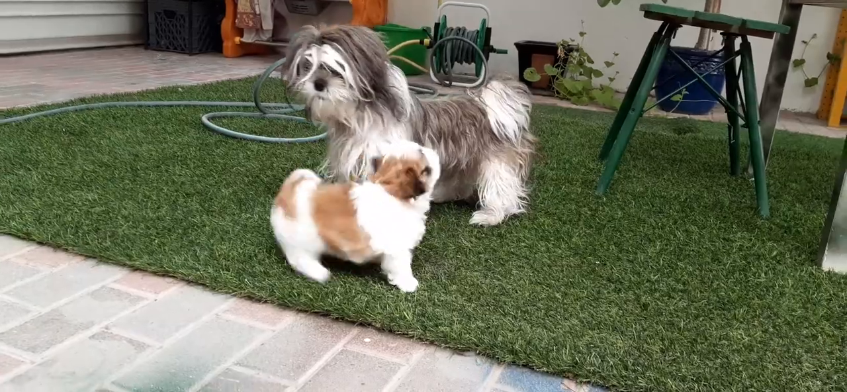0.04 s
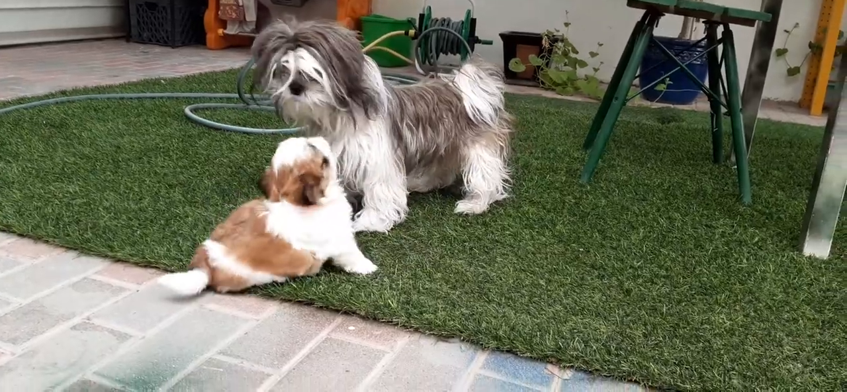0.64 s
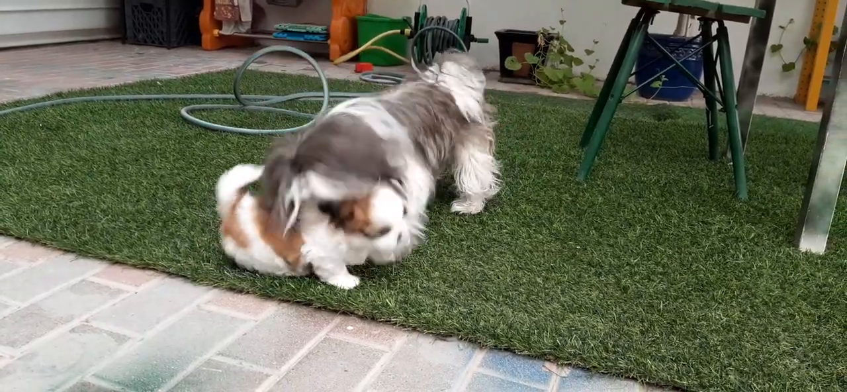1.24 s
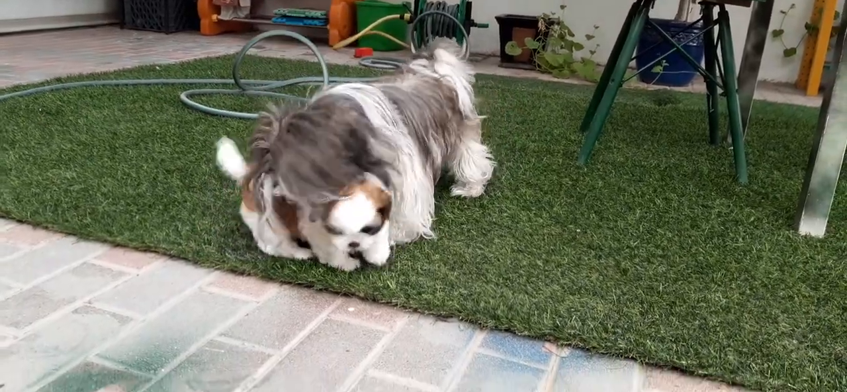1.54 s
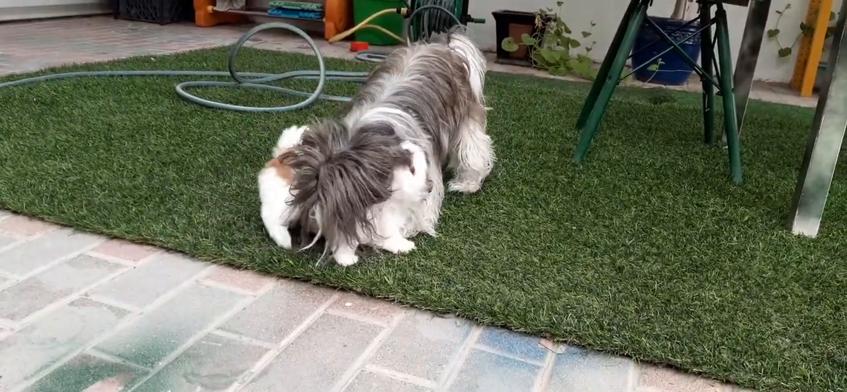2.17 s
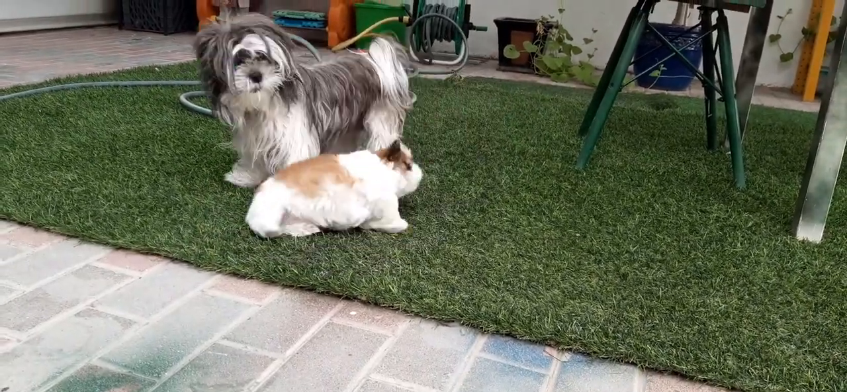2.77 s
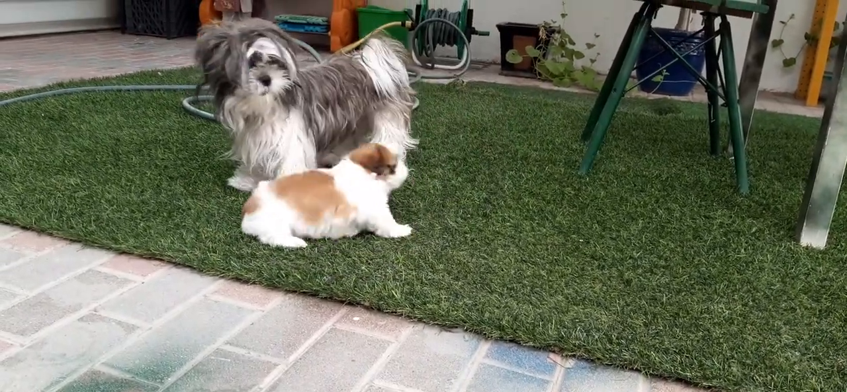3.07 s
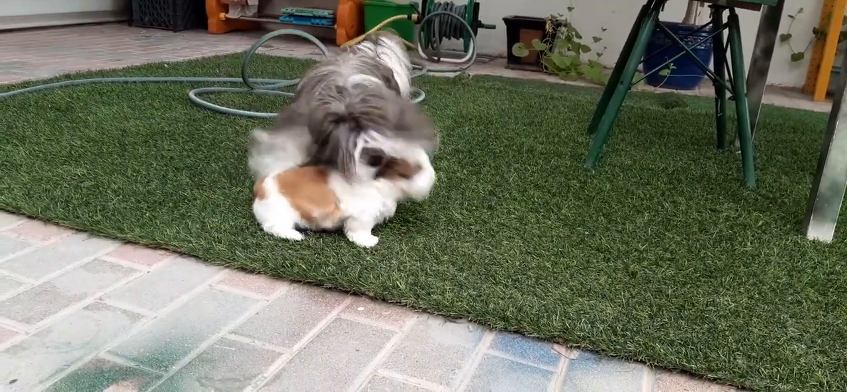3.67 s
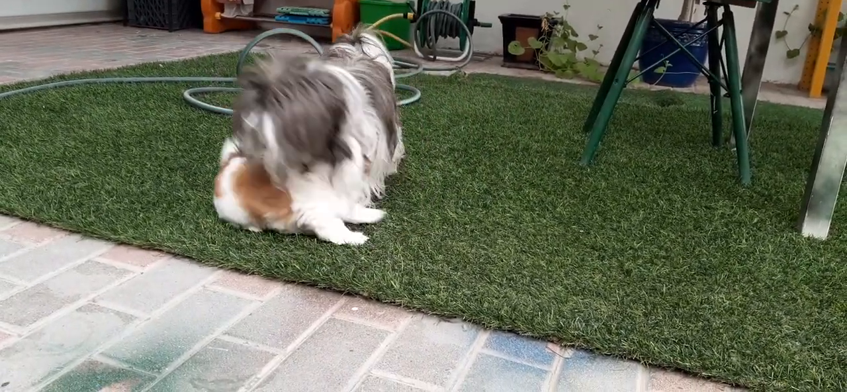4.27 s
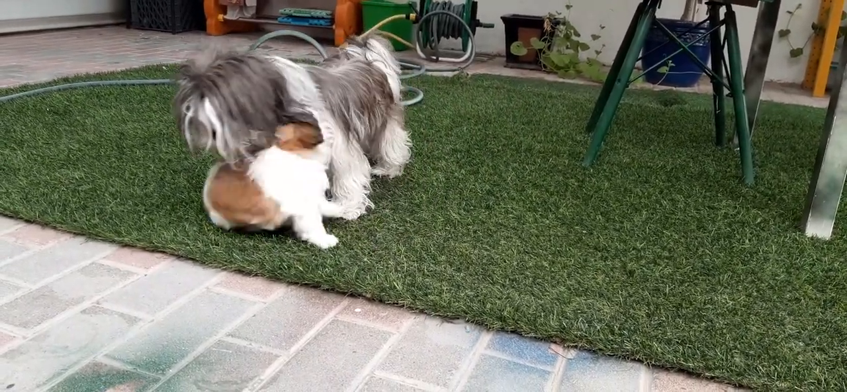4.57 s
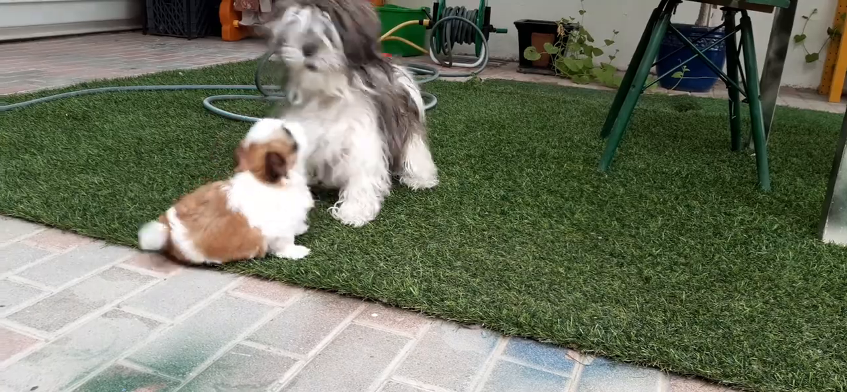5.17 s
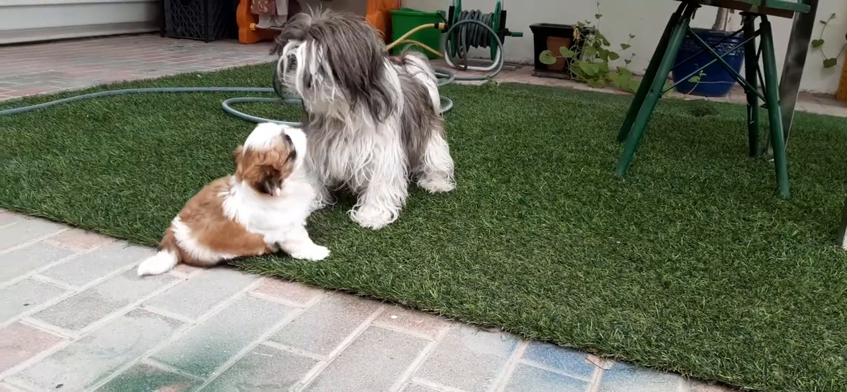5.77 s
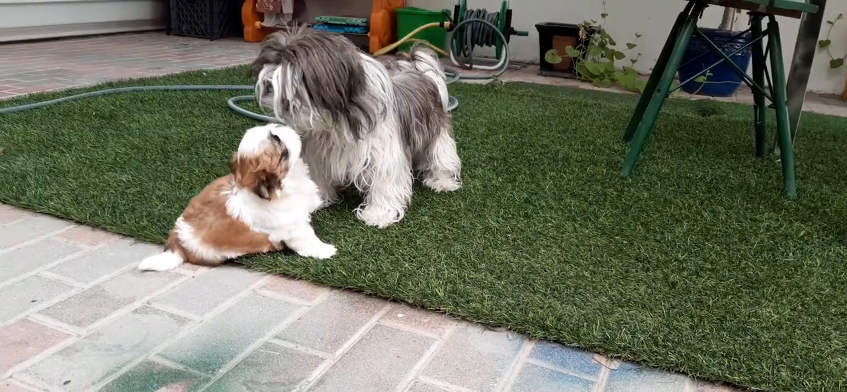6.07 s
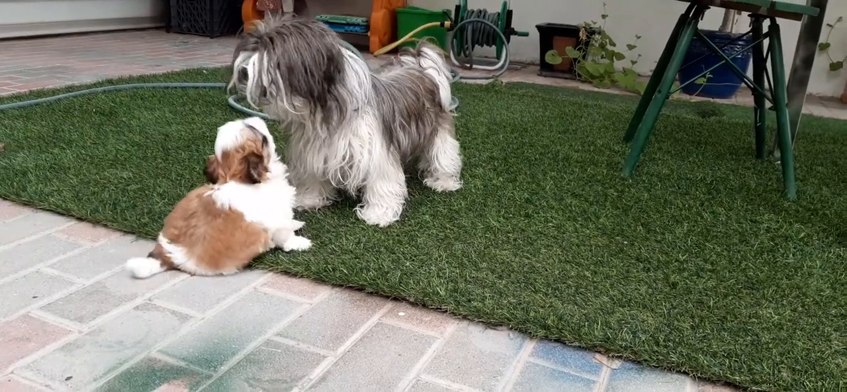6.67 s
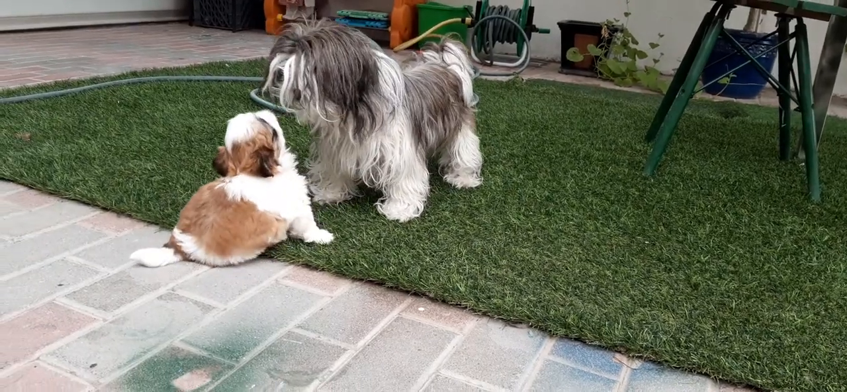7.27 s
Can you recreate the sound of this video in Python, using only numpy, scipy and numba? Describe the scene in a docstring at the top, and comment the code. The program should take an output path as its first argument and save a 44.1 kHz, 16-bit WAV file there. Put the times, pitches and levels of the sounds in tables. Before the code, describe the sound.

A small puppy growls close by in rough, rapid throbs for the first half second, playing with an older dog in a walled yard. A faint, thin whimper comes at about 0.7 seconds, followed by soft snuffling and paws scuffing on turf. Two shrill yaps at about 2.2 and 2.4 seconds ring briefly off the walls, with a growl between them and another near 2.8. A few sharp little clicks fall around 3.3 seconds and one more at 4. Growling returns near 3.8 and turns into a bright, raspy snarl from 4.2 to 4.6 seconds. A third yap comes near 4.9, amid soft footfalls. A very faint growl follows, and a last soft one at about 6.3 to 6.6 seconds. A gentle fluttering hiss swells around the yaps and growls. Sparrows chirp faintly throughout, over a low, distant town rumble, until about 7.4 seconds.

```python
"""A small puppy growls at an older dog on artificial turf in a walled yard, its voice coming through
the throat in rough throbs, about 27 a second. A faint whimper and snuffling lead to two shrill yaps
that ring off the walls. More growls and a few small clicks follow; the lips draw back in a bright
snarl, a third yap flies out near 5 s, and softer growls trail off. Along the way paws scuff, a soft
fluttering hiss swells around the yaps and growls, and sparrows chirp over a far town rumble."""
import sys
import numpy as np
from scipy import signal
from scipy.fft import rfft, irfft
from scipy.io import wavfile
from scipy.ndimage import uniform_filter1d
from numba import njit

SR = 44100
rng = np.random.default_rng(int(sys.argv[2]) if len(sys.argv) > 2 else 0)


def log_audio(samples):
    """Write samples as a 16-bit WAV file to the path given in sys.argv[1]."""
    # one column per channel
    frames = np.atleast_2d(samples).T
    # limit to full scale, then quantise
    limited = np.clip(frames, -1, 1)
    pcm = np.round(limited * 32767).astype(np.int16)
    wavfile.write(sys.argv[1], SR, pcm)


N = 327663
HZ = np.maximum(np.fft.rfftfreq(2 * N, 1 / SR), 1)   # frequency grid of the filters

# colour of the far town and of the open air: (frequency [Hz], relative level [dB])
TOWN_SPECTRUM = [(25, -39), (38, -14), (52, 0), (105, 3.5), (160, -4), (290, -6.5), (476, -20.5),
                 (796, -15.5), (1190, -42), (2410, -41), (3430, -53.5), (4870, -31), (8360, -63.5),
                 (16000, -47.5)]
AIR_SPECTRUM = [(25, -41.5), (600, -20.5), (1200, 7.5), (3000, -6), (5000, 5.5), (8000, -9.5),
                (16000, -7.5)]
# ring of the walls: (frequency [Hz], time to fall 60 dB [s])
WALL_DECAY = [(200, 0.37), (700, 0.51), (1800, 0.2257), (5000, 0.6), (14000, 0.38)]
# reverb send of the dogs: (frequency [Hz], gain [dB])
WALL_SEND = [(200, -14.5), (700, -8.5), (1500, -2.5), (2400, -6.5), (3300, -7), (5000, -16.5), (7000, -7.5),
             (9000, -7), (14000, -11)]
# colour difference of the two microphone ports: (frequency [Hz], left minus right [dB])
PORT_TILT = [(100, -2), (700, .5), (2000, 0.5), (3000, -1.5), (3700, -9), (5200, -11), (6800, -7.5),
             (8200, 7), (11000, 2), (13000, -3), (15500, -8.5)]
# how far the right port trails the left: (frequency [Hz], phase lag [rad])
PORT_PHASE = [(100, .1), (800, .6), (1500, 1), (2500, .6), (3100, .3), (4000, 2.2), (5200, 3.6),
              (7500, 6.3), (11000, 7), (15000, 8)]

# sparrow chirps, long slurs and hoarse cheeps: (time [s], length [s], start pitch [Hz], level [dB])
SPARROW_CHIRPS = [(.56, 0.17, 5510, -54), (1.135, 0.11, 5120, -51), (2.49, 0.16, 5410, -50),
                  (2.88, .09, 4898, -54), (3.81, 0.061, 4820, -61), (4.11, 0.19, 5396, -53.5),
                  (5.44, 0.15, 5480, -77), (5.985, 0.11, 6760, -60.5), (5.99, .22, 5540, -53.5),
                  (6.3, 0.12, 4850, -56), (7.22, 0.24, 5550, -55)]
SPARROW_SLURS = [(1.47, .12, 5070, -59), (6.635, .13, 5240, -61)]
SPARROW_CHEEPS = [(.92, 0.075, 4150, -64), (1.78, 0.069, 3870, -59.5), (1.905, .08, 3957, -57),
                  (2.07, .1, 3950, -56.5)]
# sharp little clicks: (time [s], peak level [dB], ring [Hz])
TICKS = [(3.2494, -27, 6200), (3.291, -23.5, 13800), (3.3384, -38.5, 7200), (4.046, -37, 7200)]

# soft high hiss that swells around the yaps and growls: (time [s], level [dB])
SOFT_HISS_LEVEL = [(0, -61.5), (.2, -64.5), (.5, -72.5), (1, -68), (1.68, -75), (2.05, -66.5), (2.4, -51),
                   (2.84, -59.5), (3.2, -76.5), (3.7, -67.5), (4.2, -66), (4.4, -55.5), (4.9, -68.5),
                   (5.08, -57.5), (5.55, -95), (6.5, -64), (7.1, -84.5), (7.43, -69.5)]
# nose puffs, paw scuffs and jaw snaps, soft landings: (centre time [s], length [s], level [dB])
NOSE_PUFFS = [(.82, 0.16, -53), (1.29, 0.21, -61), (1.69, 0.17, -48), (1.9, 0.81, -54), (2.56, 0.13, -50.5),
              (3.87, 0.19, -61.5)]
SCUFFS_AND_SNAPS = [(.49, 0.0085, -52), (1.235, 0.069, -58.5), (1.31, 0.21, -62), (1.56, .29, -58.5),
                    (1.7, .22, -57), (2.012, 0.01, -51.5), (2.536, 0.025, -35), (3.65, 0.15, -58),
                    (3.695, 0.015, -47), (4.047, 0.0101, -43), (4.68, .048, -49), (4.76, 0.16, -58.5),
                    (5.104, 0.037, -48.5)]
LANDINGS = [(.66, 0.19, -56.5), (.76, 0.076, -56), (4.7, 0.33, -52.5), (5.06, 0.071, -51),
            (5.105, 0.054, -45.5)]
# colour of the soft hiss, nose, scuffs and landings: (frequency [Hz], relative level [dB])
SOFT_HISS_SPECTRUM = [(400, -0.5), (900, 4.5), (1500, -3.5), (2400, 0.5), (4000, 3.5), (7000, 3.5),
                      (9000, -18.5), (12000, -3.5), (16000, -2.5)]
NOSE_SPECTRUM = [(1000, -7.5), (1400, -19), (2000, -12), (2700, -12), (3600, 0.5), (4800, 1.5), (6000, 3),
                 (7000, 2), (9000, -21), (10500, -9.5), (13000, -7), (16000, -3.5)]
SCUFF_SPECTRUM = [(150, -6.5), (700, 3.5), (1400, -9), (2200, -1), (3200, -11.5), (6500, -6),
                  (9000, -30), (15000, -19)]
LANDING_SPECTRUM = [(40, -21), (90, -2.5), (350, -3), (650, -16), (1300, -28.5), (4000, -58.5)]

# a faint whimper: (time [s], length [s], start pitch [Hz], level [dB])
WHIMPER_NOTE = [(.745, 0.052, 553, -55)]
# muzzle resonances for rasp, hiss and drawn-back lips: (centre [Hz], width [Hz], gain [dB])
RASP_MODES = [(1360, 540, -10.5), (1730, 640, -5), (2079, 430, 1.5), (2402, 110, -1), (4096, 410, -13),
              (4710, 620, -15.5)]
HISS_MODES = [(3320, 1100, -6), (3780, 417, 1), (4540, 250, 0), (5090, 305.3, 0), (5930, 470, -10.5)]
SNARL_MODES = [(2510, 230, 4.5), (3200, 290, -8), (3860, 350, -3.5), (4850, 480, -0.5), (5530, 580, -7.5),
               (6940, 290, -18.5)]
# one curve per growl, first throb to last: (time [s], throat tuning [Hz], throat [dB], rasp [dB])
GROWL_CURVES = [
    [(0.017, 490, -33, -44), (0.14, 417, -38.5, -56.5), (0.25, 448, -37.5, -51.5), (0.398, 335, -40.5, -62)],
    [(2.272, 470, -33.5, -56.5), (2.308, 454, -37.5, -56), (2.345, 498, -31.5, -47.5)],
    [(2.695, 755.5, -35, -57), (2.725, 840, -30.5, -44.5), (2.82, 625, -38.5, -57.5),
     (2.95, 700, -32.5, -46.5), (2.982, 720, -35.5, -51)],
    [(3.742, 653, -47, -68.5), (3.855, 571, -38, -47.5), (3.974, 417, -43.5, -64.5)],
    [(4.186, 648, -34, -42), (4.3, 459, -30, -47), (4.365, 511, -29.5, -39), (4.44, 490, -31, -55.5),
     (4.51, 477.5, -32, -34.5), (4.55, 524, -40, -46.5)],
    [(5.228, 488, -54, -76), (5.304, 480, -52.5, -84)],
    [(6.28, 413, -40, -60), (6.4, 466, -41.5, -58.5), (6.592, 367, -52.5, -70.5)],
]
# bright rasp as the lips draw back in the fiercest growl: (time [s], level [dB])
SNARL_LEVEL = [(4.179, -37.5), (4.22, -39), (4.255, -32), (4.3, -32.5), (4.35, -24.5), (4.39, -61),
               (4.45, -62.5), (4.48, -33.5), (4.56, -53)]
# yaps: (start [s], hardest push [s], crest [s], end [s], top pitch [Hz], mouth resonance at start [Hz],
# at crest [Hz], at end [Hz], mouth level [dB], fade by the end [dB], flare at the crest [dB],
# throat level [dB], hiss level [dB], extra lag at the right port [ms])
YAP_CUES = [(2.145, 2.175, 2.203, 2.248, 750.2, 2330, 2328, 2254, -12, 22, -1, -22, -22, -0.023),
            (2.35, 2.396, 2.399, 2.464, 720.3, 2650, 2290, 1800, -22.5, 16, 10.5, -26, -28, 0.015),
            (4.843, 4.869, 4.898, 4.955, 810.7, 2044, 1620, 1473, -25, 3.5, 11, -30, -23, 0.1)]

THROBS_PER_S, THROB_SCATTER_DB = 27, 1
FIRST_THROB_S, THROB_GROWTH = .032, .075   # throbs lengthen [s per s] and run together
SNARL_BETWEEN = .21   # share of the air that still passes between throbs
PITCH_START, PITCH_END = .54, .76   # shares of a yap's top pitch
MOUTH_RISE_DB, FLARE_S = 13.5, .0075   # swell; half-width of the flare as a harmonic meets the resonance
THROAT_CONTOUR_DB = [-14.5, 0, -12, -1.5, -13.5]   # at the start, push, dip, closing grunt and end
HISS_RISE_DB, HISS_FADE_DB, HISS_FLARE_SHARE = 19, 16, .4
OCTAVE_DB, OCTAVE_RISE_DB, OCTAVE_FADE_DB, OCTAVE_JAW_DB = -31.5, 16.5, 6.5, 11   # second harmonic


def from_db(db):
    """Decibels to gain."""
    return 10 ** (np.asarray(db) / 20)


def rms_one(x):
    """Scale to rms 1."""
    return x / np.sqrt(np.mean(x ** 2) + 1e-20)


def at_hz(points):
    """Lay a spectrum table on the frequency grid."""
    hz, value = np.transpose(points)
    return np.interp(np.log(HZ), np.log(hz), value)


def filtered(x, response):
    """Apply a frequency response."""
    return irfft(rfft(x, 2 * N) * response)[..., :N]


def noise(spectrum, channels=1):
    """Coloured noise at rms 1."""
    return rms_one(filtered(rng.standard_normal((channels, N)), from_db(at_hz(spectrum))))


def band(x, low_hz, high_hz, order=2):
    """Band-pass."""
    edges = [low_hz, min(high_hz, .45 * SR)]
    return signal.sosfilt(signal.butter(order, edges, "band", fs=SR, output="sos"), x)


def add(track, s, sound):
    """Mix a sound in from time s on."""
    start = max(round(s * SR), 0)
    track[start:start + len(sound)] += sound[:N - start]


def swells(rows):
    """An envelope with one smooth swell per row."""
    out = np.zeros(N)
    for s, length, db in rows:
        add(out, s - length / 2, from_db(db) * np.hanning(int(length * SR)))
    return out


def wobble(count, rate):
    """Random modulation with a spread of about 1 and `rate` breakpoints a second."""
    knots = rng.standard_normal(1024)
    return 1.2 * np.interp(np.arange(count) * rate / SR % 1023, np.arange(1024), knots)


def evened(x, window_s):
    """A fast leveller: holds the short-time rms at 1."""
    return x / np.sqrt(uniform_filter1d(x ** 2, max(int(window_s * SR), 8)) + 1e-12)


@njit
def glide_filter(x, angle, r):
    """A ringing two-pole band-pass whose centre can sweep."""
    y = np.zeros(len(x))
    for i in range(2, len(x)):
        drive = (1 - r * r) / 2 * (x[i] - x[i - 2])
        y[i] = drive + 2 * r * np.cos(angle[i]) * y[i - 1] - r * r * y[i - 2]
    return y


def resonate(x, hz, width):
    """One resonance, steady or swept, with unity gain at its peak."""
    return glide_filter(x, 2 * np.pi * hz / SR * np.ones(len(x)), np.exp(-np.pi * width / SR))


def town():
    """The bed: a far rumble, nearly mono, under a faint wide hiss of air."""
    width = from_db(-15) * noise(TOWN_SPECTRUM, channels=2)
    air = noise(AIR_SPECTRUM, channels=2)
    return from_db(-57.5) * (noise(TOWN_SPECTRUM) + width) + from_db(-77) * air


def yard():
    """Response of the walls at each port: dense echoes that die band by band, alike in the bass."""
    t = np.arange(SR) / SR
    white = rng.standard_normal((3, len(t)))
    build_up = 1 - np.exp(-t / .003)
    echoes = np.zeros((2, len(t)))
    for low in 125 * 2. ** np.arange(7):
        hz = low * np.sqrt(2)
        alike = 1 / (1 + (hz / 1200) ** 2)
        scatter = band(np.sqrt(alike) * white[0] + np.sqrt(1 - alike) * white[1:], low, 2 * low, order=3)
        decay = from_db(-60 * t / np.interp(hz, *np.transpose(WALL_DECAY))) * build_up
        echoes += scatter * decay / np.sqrt(np.sum(decay ** 2))
    return rfft(echoes, 2 * N)


def near_scatter():
    """Paving and furniture scatter the treble, shifting its phase differently at each port."""
    knots_hz = np.linspace(0, SR / 2, 128)
    phase = np.array([np.interp(HZ, knots_hz, row) for row in rng.standard_normal((2, len(knots_hz)))])
    return np.exp(1j * phase * np.minimum(HZ / 14000, .8))


def whistles(rows, glide_octaves, hoarse, octave_db):
    """Gliding notes that swell and fade, roughened by a fast uneven trill of depth `hoarse`."""
    out = np.zeros(N)
    for s, length, start_hz, db in rows:
        count = int(length * SR)
        glide = np.geomspace(start_hz, start_hz * 2 ** glide_octaves, count)
        phase = 2 * np.pi * np.cumsum(glide * (1 + hoarse * wobble(count, 900))) / SR
        flutter = from_db(3 * wobble(count, 150))
        note = (np.sin(phase) + from_db(octave_db) * np.sin(2 * phase)) * flutter
        add(out, s, from_db(db) * rms_one(note * signal.windows.tukey(count, .8)))
    return out


def sparrows():
    """Every note falls in pitch: chirps and cheeps a little, slurs by most of an octave."""
    return (whistles(SPARROW_CHIRPS, glide_octaves=-.28, hoarse=.045, octave_db=-38)
            + whistles(SPARROW_SLURS, glide_octaves=-.8, hoarse=.051, octave_db=-29.5)
            + whistles(SPARROW_CHEEPS, glide_octaves=-.2, hoarse=.07, octave_db=-5))


def clicks():
    """Dry ticks, each with a quick reflection off the ground."""
    out = np.zeros(N)
    t = np.arange(256) / SR
    for s, db, hz in TICKS:
        crack = band(rng.standard_normal(len(t)) * np.exp(-t / .0001), 5760, 10840)
        tick = resonate(crack, hz, width=1700) + .32 * crack
        tick = from_db(db) * tick / np.abs(tick).max()
        add(out, s, tick)
        add(out, s + .0021, from_db(-12) * tick)
    return out


def soft_hiss():
    """A soft, fluttering high hiss that swells around the yaps and growls."""
    level_db = np.interp(np.arange(N) / SR, *np.transpose(SOFT_HISS_LEVEL))
    return from_db(level_db + .81 * wobble(N, 170)) * noise(SOFT_HISS_SPECTRUM)[0]


def tussle():
    """Body foley from shaped noise: snuffling, gritty scuffs and soft footfalls."""
    snuffs = swells(NOSE_PUFFS) * noise(NOSE_SPECTRUM)[0]
    scuffs = swells(SCUFFS_AND_SNAPS) * noise(SCUFF_SPECTRUM)[0]
    thuds = swells(LANDINGS) * noise(LANDING_SPECTRUM)[0]
    grit = from_db(2.7 * wobble(N, 290))
    return snuffs + scuffs * grit + thuds


def whimper():
    """One thin, rising whine."""
    return whistles(WHIMPER_NOTE, glide_octaves=.28, hoarse=.057, octave_db=-21)


def folds(pitch, jitter, shimmer_db, breath):
    """Uneven vocal-fold pulses, with a puff of turbulence in each cycle."""
    count = len(pitch)
    cycles = np.cumsum(pitch * (1 + jitter * wobble(count, 500))) / SR + rng.random()
    pulses = np.diff(np.floor(cycles), prepend=0) * from_db(shimmer_db * wobble(count, 400))
    puffs = rng.standard_normal(count) * np.exp(-3 * (cycles % 1))
    return rms_one(pulses) + breath * rms_one(puffs)


def tract(x, modes):
    """Parallel vocal resonances, each applied twice to keep the valleys between them dark."""
    return sum(from_db(db) * resonate(resonate(x, hz, width), hz, width) for hz, width, db in modes)


def hiss(source):
    """Turbulence in the muzzle, with a faint sizzle at the teeth."""
    sizzle = band(source, 10790, 19000, order=6)
    return evened(tract(source, HISS_MODES) + from_db(-24) * sizzle, .0083)


def throbs():
    """The growls' steady beat: (start [s], opening, throat tuning [Hz], throat [dB], rasp [dB])."""
    for curve in GROWL_CURVES:
        times, *columns = np.transpose(curve)
        count = round((times[-1] - times[0]) * THROBS_PER_S) + 1
        for s in np.linspace(times[0], times[-1], count):
            length = FIRST_THROB_S + THROB_GROWTH * (s - times[0])
            progress = np.linspace(0, 1, int(length * SR))
            opening = np.sin(np.pi * progress ** .52).clip(0)   # opens faster than it closes
            yield s - .3 * length, opening, *(np.interp(s, times, column) for column in columns)


def growl():
    """Loose throat tissue lets the voice through in short rough throbs."""
    out = np.zeros(N)
    for start, opening, tuning_hz, throat_db, rasp_db in throbs():
        pitch = np.full(len(opening), rng.uniform(230, 380))
        source = folds(pitch, jitter=.15, shimmer_db=6, breath=.3)
        tuning_hz *= np.exp(.1 * rng.standard_normal())
        throat = tract(source, [(1.18 * tuning_hz, 400, 0), (110 + .42 * tuning_hz, 230, 1.5)])
        throat = evened(band(throat, 99, 930, order=3), .011)
        rasp = evened(tract(source, RASP_MODES), .01) + from_db(-34) * hiss(source)
        throb = from_db(throat_db) * throat * opening ** 1.73 + from_db(rasp_db) * rasp * opening ** 1.1
        add(out, start, from_db(THROB_SCATTER_DB * rng.standard_normal()) * throb)
    return out


def snarl():
    """The lips draw back and the growl turns bright, throb by throb."""
    times, levels = np.transpose(SNARL_LEVEL)
    level_db = np.interp(np.arange(times[0], times[-1], 1 / SR), times, levels)
    source = folds(np.full(len(level_db), 290), jitter=.2, shimmer_db=5, breath=.9)
    bright = tract(source, SNARL_MODES) + from_db(-27) * band(source, 10700, 16500, order=6)
    out, flow = np.zeros((2, N))
    add(out, times[0], from_db(level_db) * evened(bright, .028))
    for start, opening, *_ in throbs():
        add(flow, start, opening ** 2)
    return out * (SNARL_BETWEEN + (1 - SNARL_BETWEEN) * flow)


def yap(start, push, crest, end, top_hz, start_hz, crest_hz, end_hz,
        peak_db, fade_db, flare_db, throat_db, air_db):
    """The pitch leaps over a rattle an octave below; an opening jaw lowers and broadens the bark."""
    t = np.arange(start, end, 1 / SR)
    before = np.clip((crest - t) / (crest - start), 0, 1)   # 1 at the start, 0 from the crest on
    after = np.clip((t - crest) / (end - crest), 0, 1)   # 0 up to the crest, 1 at the end
    pitch = top_hz * (1 - (1 - PITCH_START) * before ** 1.5 - (1 - PITCH_END) * after ** 2)
    mouth_hz = np.interp(t, [start, crest, end], [start_hz, crest_hz, end_hz])
    jaw = np.clip((2250 - mouth_hz) / 600, 0, 1)

    flare = flare_db * np.exp(-((t - crest) / FLARE_S) ** 2)
    grunt = crest + .75 * (end - crest)
    dip = (crest + grunt) / 2
    mouth_db = peak_db - MOUTH_RISE_DB * before - fade_db * after + flare
    body_db = throat_db + np.interp(t, [start, push, dip, grunt, end], THROAT_CONTOUR_DB)
    octave_db = OCTAVE_DB - OCTAVE_RISE_DB * before + (OCTAVE_JAW_DB * jaw - OCTAVE_FADE_DB) * after
    hiss_db = air_db - np.interp(t, [start, push, end], [HISS_RISE_DB, 0, HISS_FADE_DB])
    hiss_db += HISS_FLARE_SHARE * flare

    source = folds(pitch, jitter=.07, shimmer_db=4, breath=.45 + .6 * jaw)
    phase = 2 * np.pi * np.cumsum(pitch * (1 + .03 * wobble(len(pitch), 400))) / SR
    rattle = folds(pitch / 2, jitter=.2, shimmer_db=5, breath=.8)
    body = 1.05 * np.sin(phase) + .6 * evened(band(rattle, 270, 1150), .008)
    octave = 1.15 * np.sin(2 * phase) + .45 * evened(band(source, 950, 1650), .008)
    mouth = evened(tract(source, [(mouth_hz, 400, 0)]), .0035)
    bark = from_db(-11 + 10 * jaw) * evened(band(source, 2200, 3380, order=3), .0058)
    voice = (from_db(body_db) * body + from_db(octave_db) * octave
             + from_db(mouth_db) * (mouth + bark) + from_db(hiss_db) * hiss(source))
    return voice * signal.windows.tukey(len(voice), .1)


def yaps():
    """Three shrill yaps, each from a slightly different direction as the puppy twists about."""
    out = np.zeros((2, N))
    for start, *shape, lag_ms in YAP_CUES:
        left = yap(start, *shape)
        hz = np.fft.rfftfreq(len(left), 1 / SR)
        right = irfft(rfft(left) * np.exp(-2j * np.pi * hz * lag_ms / 1000), len(left))
        add(out[0], start, left)
        add(out[1], start, right)
    return out


def scene():
    """The mix: dogs close by and a little to the left, birds heard mostly by way of the walls."""
    walls = yard()
    direct = np.exp(-1j * at_hz(PORT_PHASE) * np.array([[0], [1]]))
    puppy = growl() + snarl() + yaps() + whimper()
    close = puppy + soft_hiss() + tussle()
    dogs = filtered(close, direct * near_scatter() + walls * from_db(at_hz(WALL_SEND)))
    birds = filtered(sparrows(), from_db(1) * direct + from_db(2.5) * walls)
    return town() + birds + filtered(clicks(), direct) + dogs


def record(dry):
    """Each microphone port has its own colour; the top is cut steeply at 16 kHz."""
    tilt = from_db(at_hz(PORT_TILT) * np.array([[.5], [-.5]]))
    coloured = filtered(dry, tilt / np.sqrt(np.mean(tilt ** 2, axis=0)))
    return signal.sosfilt(signal.ellip(10, .3, 70, 16000, fs=SR, output="sos"), coloured)


dry = scene()
out = record(dry)
log_audio(out)
```